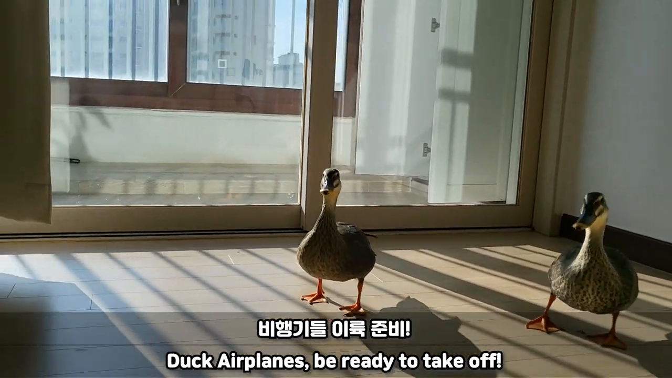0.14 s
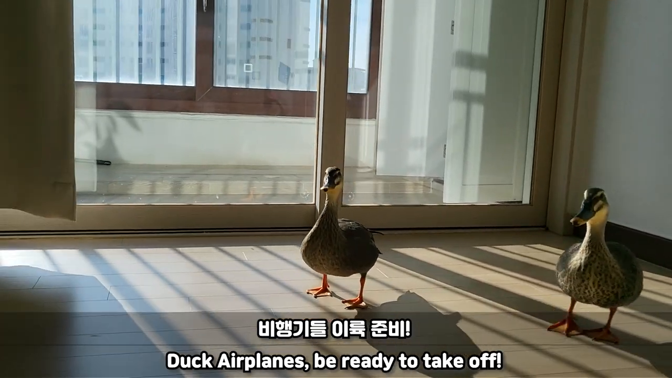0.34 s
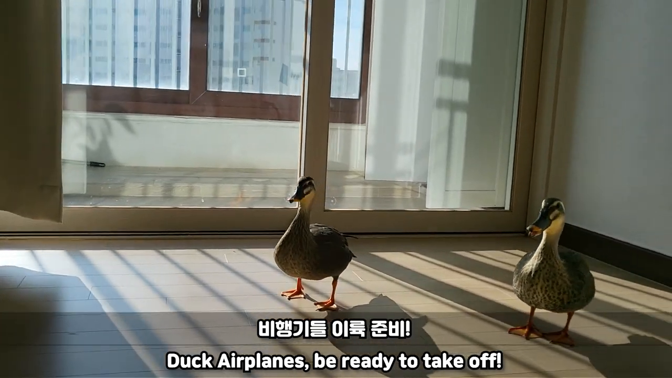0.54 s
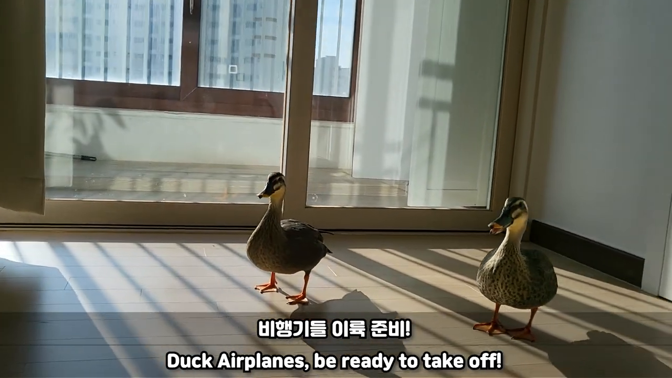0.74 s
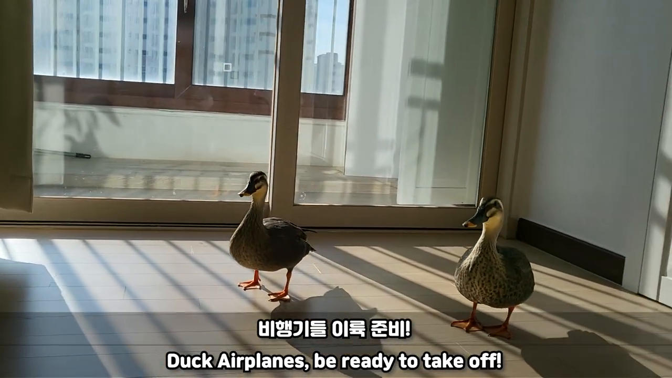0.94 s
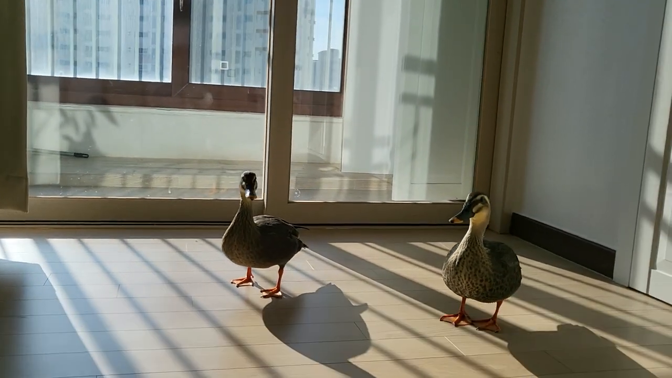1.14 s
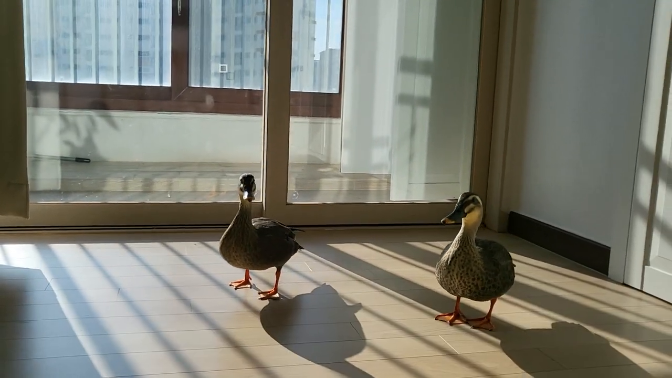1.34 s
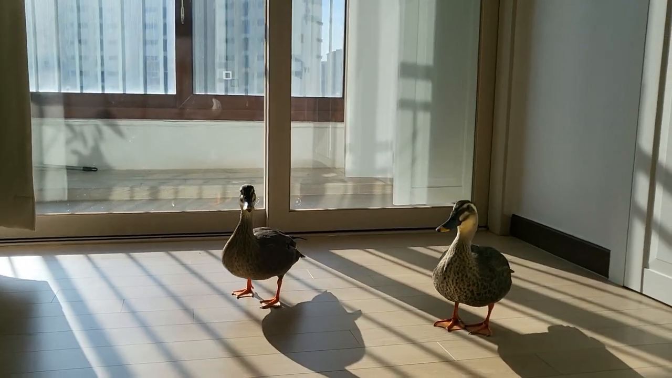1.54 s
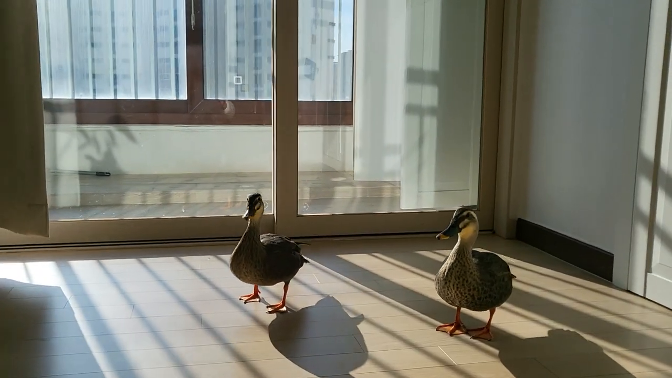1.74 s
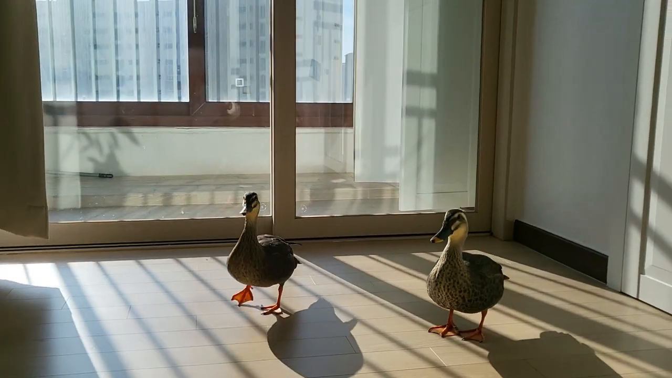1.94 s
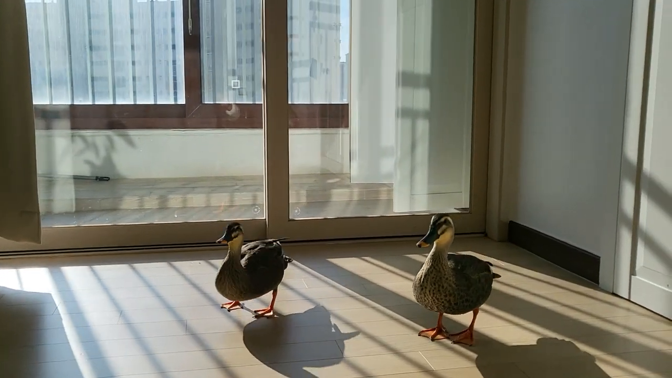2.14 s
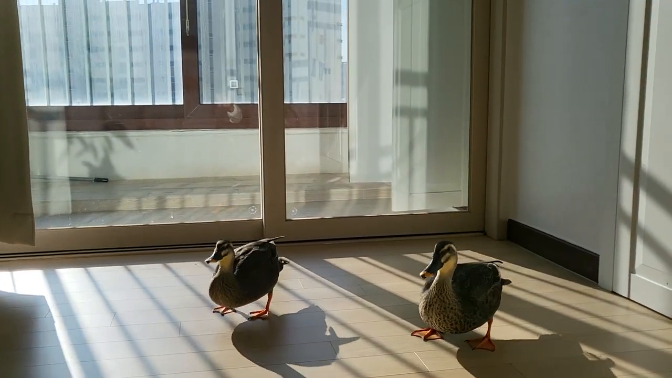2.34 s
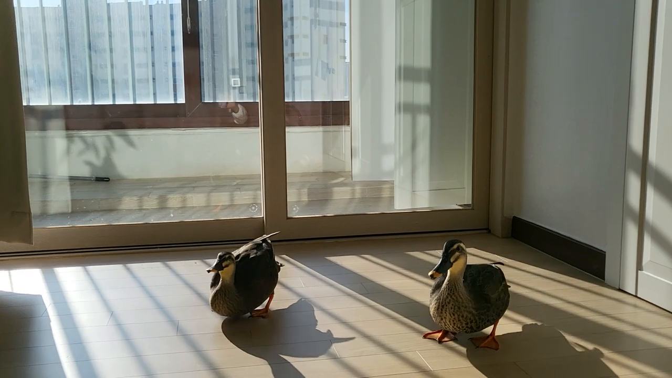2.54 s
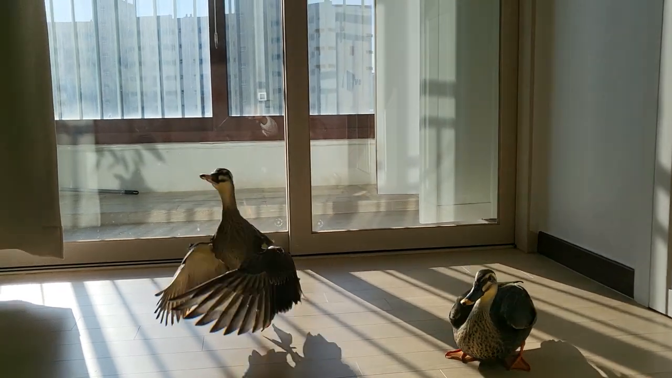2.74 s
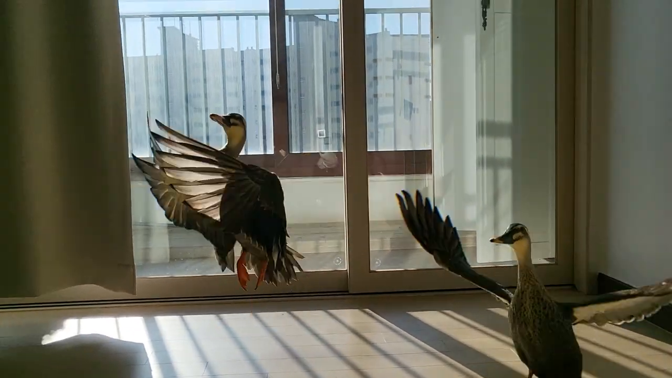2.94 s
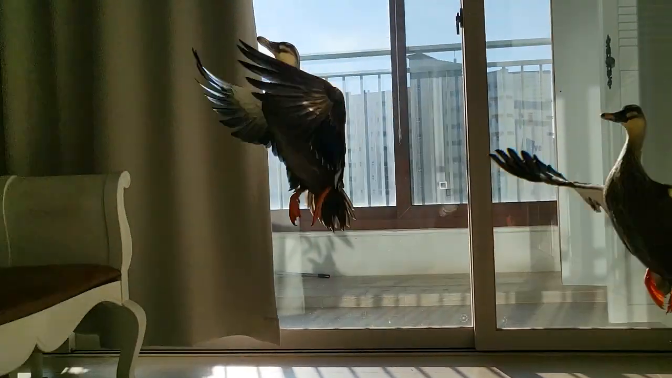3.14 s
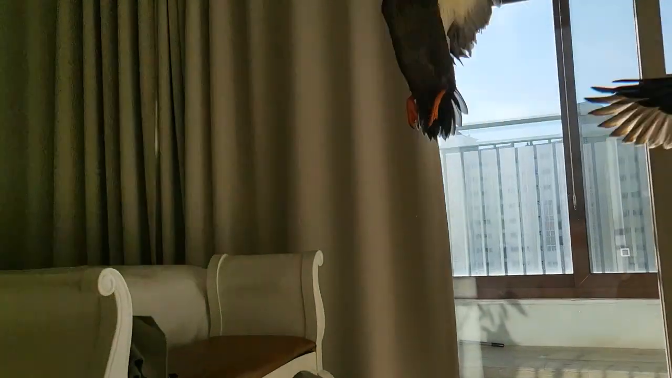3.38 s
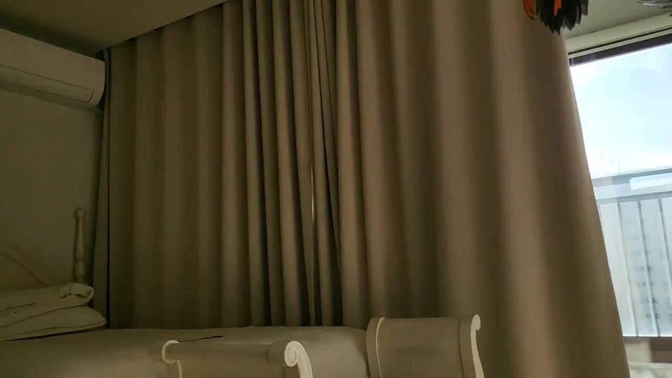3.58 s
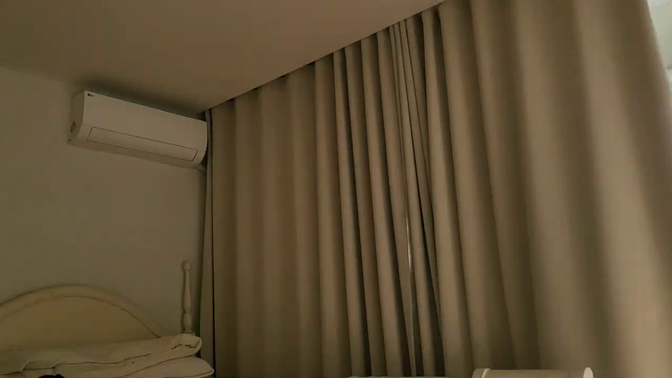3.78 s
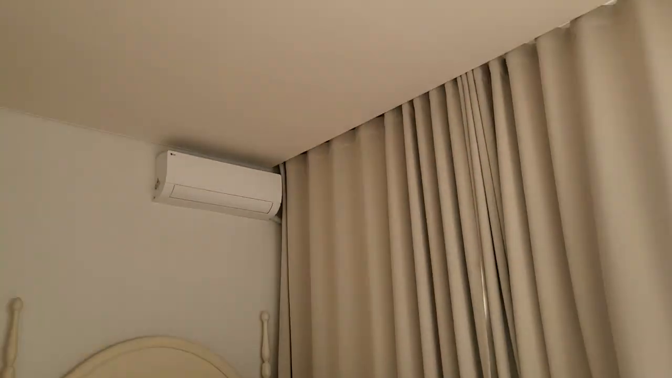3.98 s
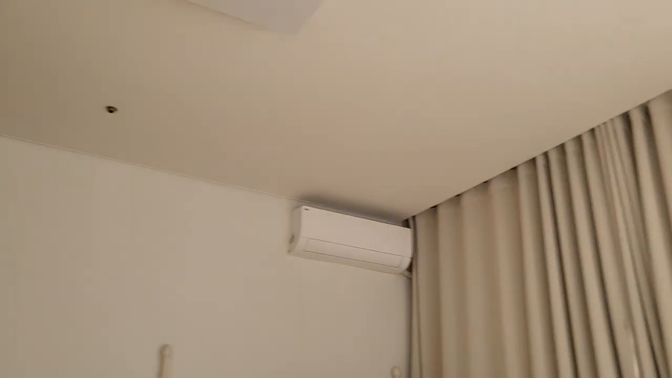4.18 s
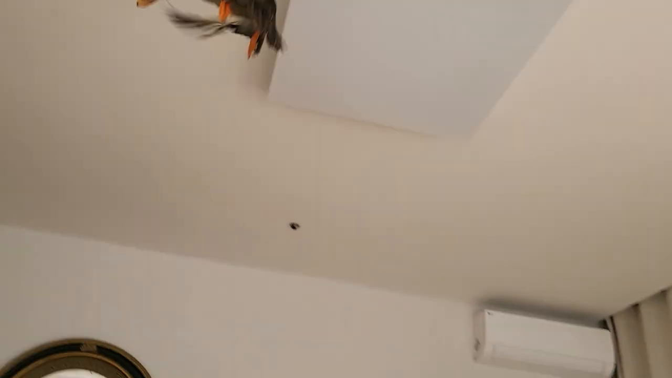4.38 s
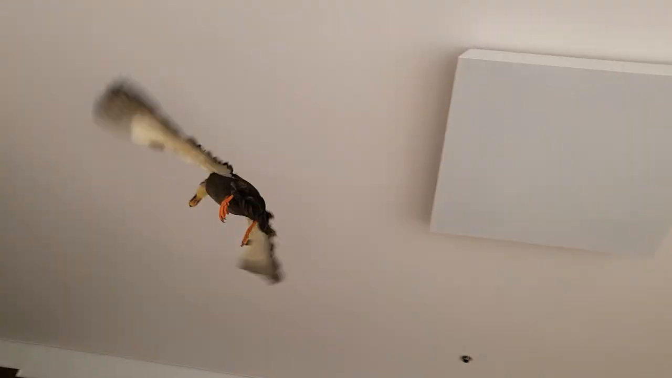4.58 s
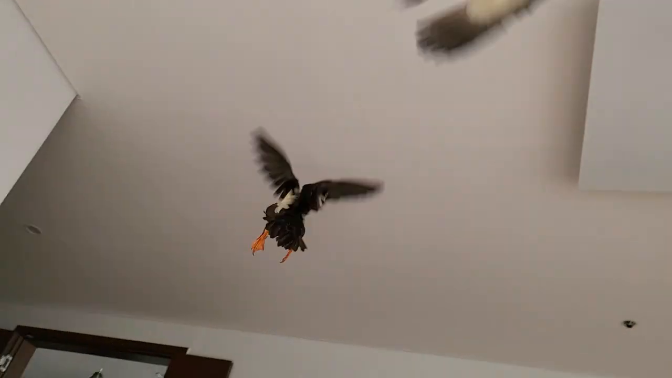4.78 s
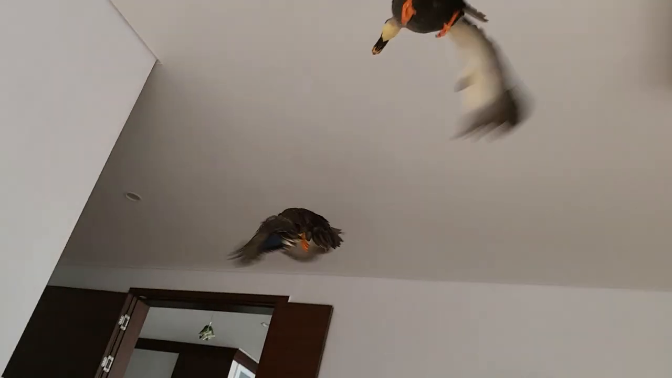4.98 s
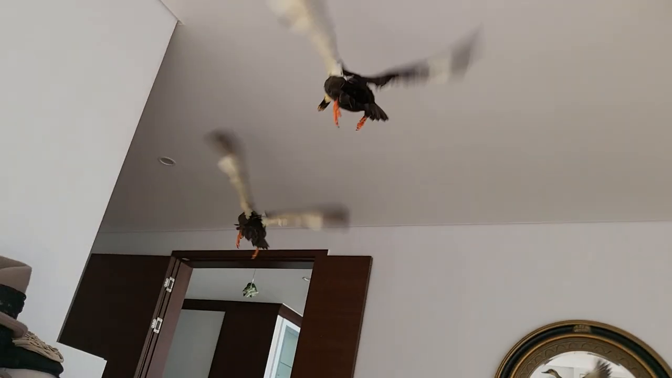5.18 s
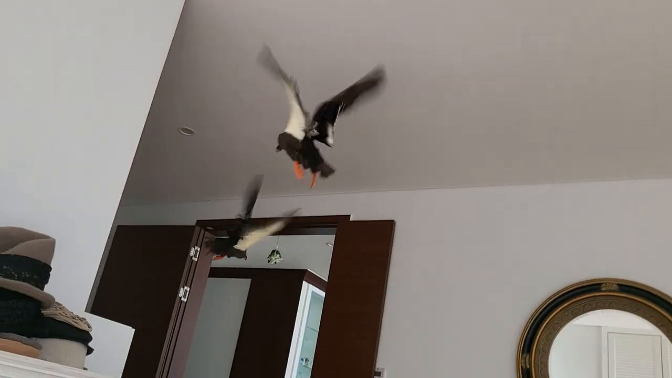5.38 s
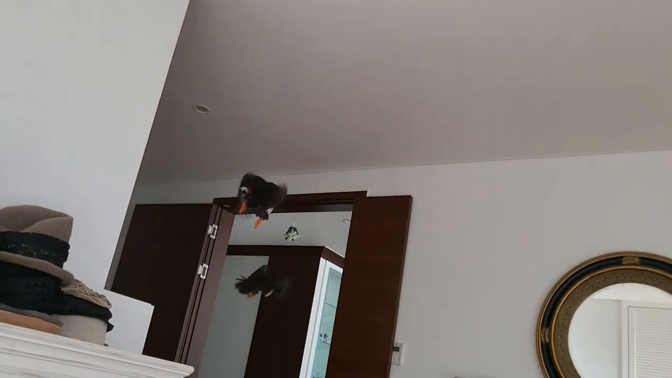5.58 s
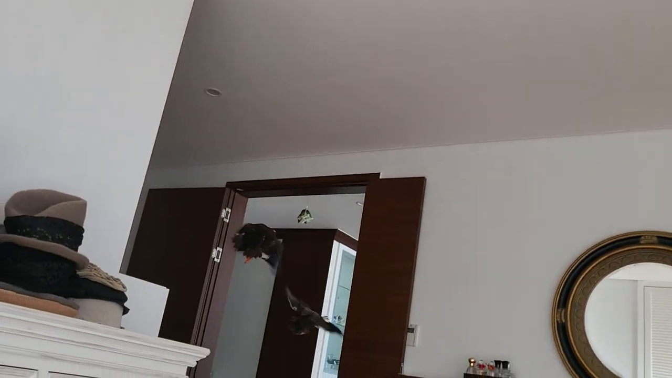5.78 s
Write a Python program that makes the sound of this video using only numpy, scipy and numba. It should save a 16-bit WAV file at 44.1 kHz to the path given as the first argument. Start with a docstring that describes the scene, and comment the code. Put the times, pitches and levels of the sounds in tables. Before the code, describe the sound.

Hoarse duck quacks, soft peeps and webbed footsteps in a quiet room give way to loud flapping, swishing feathers and gusts of air.

```python
"""Wingbeats of two ducks taking off in a living room: each stroke displaces air with a clap and a whoosh, while
feathers rush, swish, snap and squeak. The downwash buffets the microphone, and the loudest moments clip. Before
the flight come hoarse quacks, pulses of the syrinx filtered by windpipe and bill, with soft peeps, shuffling
and webbed steps on the hard floor. Calls and steps reverberate over a quiet house."""
import sys
import numpy as np
from scipy import signal
from scipy.fft import rfft, irfft
from scipy.io import wavfile
from scipy.ndimage import uniform_filter1d
from numba import njit

SR = 44100
rng = np.random.default_rng(int(sys.argv[2]) if len(sys.argv) > 2 else 0)


def store_wav(level_fs):
    """Save 16-bit WAV to argv[1]."""
    pcm = np.round(np.clip(np.atleast_2d(level_fs), -1, 1) * 32767)
    wavfile.write(sys.argv[1], SR, pcm.T.astype(np.int16))


N = 256652


def undb(db):
    """Amplitude ratio of a level in decibels."""
    return 10 ** (np.asarray(db) / 20)


def level(x, db):
    """Normalisation to a given rms level."""
    return x * undb(db) / np.sqrt(np.mean(x ** 2))


def even(x, span_s):
    """Division by the running rms: slow level changes vanish, faster grain stays."""
    power = np.atleast_2d(x ** 2).mean(axis=0)
    span = int(span_s * SR)
    return x / np.sqrt(np.maximum(uniform_filter1d(uniform_filter1d(power, span), span), 1e-18))


def pan(x, db):
    """Level difference between channels: left exceeds right by db."""
    return x * undb(np.array([db / 2, -db / 2]).reshape(2, -1))


def add(track, start_s, sound):
    """Superposition of a short sound on a track."""
    i = int(start_s * SR)
    n = min(sound.shape[-1], N - i)
    track[..., i:i + n] += sound[..., :n]


def arch(swell_s, fade_s, swell_db, fade_db):
    """Envelope in dB relative to its peak: a rounded rise, then exponential decay."""
    t = np.arange(0, swell_s + fade_s, 1 / SR)
    rise_db = -swell_db * np.clip(1 - t / swell_s, 0, 1) ** 1.3
    return rise_db - fade_db * np.clip((t - swell_s) / fade_s, 0, 1)


@njit
def resonator(x, hz, width_hz):
    """Second-order resonance: a state-variable band-pass with unit gain at the centre."""
    y, band, low = np.empty(len(x)), 0., 0.
    g, damping = np.tan(np.pi * hz / SR), width_hz / hz
    for i in range(len(x)):
        v = (band + g * (x[i] - low)) / (1 + g * (g + damping))
        band, low, y[i] = 2 * v - band, low + 2 * g * v, damping * v
    return y


def ring(x, modes):
    """Modal sum: fourth-order resonances (centre_hz, width_hz, gain_db) of alternating sign."""
    return sum((-1) ** k * undb(db) * resonator(resonator(x, hz, width), hz, width)
               for k, (hz, width, db) in enumerate(np.array(modes, float)))


def wander(rate_hz):
    """Random modulation: stepped Gaussian values, smoothed twice."""
    hold = int(SR / rate_hz)
    stairs = np.repeat(rng.standard_normal(N // hold + 1), hold)
    return .78 * uniform_filter1d(uniform_filter1d(stairs, hold), hold)[:N]


def band_noise(spectrum, side, flicker_db, flicker_hz):
    """Stereo noise in independently modulated half-octave bands; side decorrelates the channels."""
    hz, db = np.transpose(spectrum)
    octaves = np.arange(0, np.log2(hz[-2] / hz[1]) + .3, .5)
    out = 0
    for centre in np.clip(hz[1] * 2 ** octaves, 1, .33 * SR):
        width = centre / 2 / np.sinc(2 * centre / SR)  # offsets the filter's narrowing in the treble
        mid, diff = (ring(rng.standard_normal(N), [(centre, width, 0)]) for _ in range(2))
        gain = undb(np.interp(np.log(centre), np.log(hz), db) + flicker_db * wander(flicker_hz))
        out = out + gain * (mid + side * diff * np.array([[1], [-1]]))
    return even(out, .05)


# Background spectrum of the house: frequency_hz, relative_db
HOUSE_SPECTRUM = [(24, -35), (40, 1), (80, -3), (174, -3.5), (213, -10), (387, -11.5), (1130, -21),
                  (1960, -21), (5050, -30), (11200, -18), (15500, -32)]

def house():
    """Ambient noise floor: faint, strongest in the bass, uncorrelated between the channels."""
    return undb(-56.5) * pan(band_noise(HOUSE_SPECTRUM, side=1, flicker_db=.7, flicker_hz=13), 1.2)


@njit
def walls(x, lags, gain, damping):
    """Repeated reflection: eight coupled delay lines lose a little treble on every pass."""
    line, echo, out = np.zeros((8, 4096)), np.zeros(8), np.zeros((2, len(x)))
    for i in range(len(x)):
        total = 0.
        for k in range(8):
            echo[k] += (1 - damping) * (gain[k] * line[k, (i - lags[k]) & 4095] - echo[k])
            total += echo[k]
            out[k % 2, i] += echo[k]
        for k in range(8):
            line[k, i & 4095] = x[i] + echo[k] - total / 4
    return out


def reverberation(direct, t60_s=.28):
    """Reflected sound decays exponentially; curtains and thin walls let the bass escape."""
    lags = rng.integers(300, 1800, size=8)
    retained = resonator(direct.mean(axis=0) + 1e-18, 1730., 9000.)
    echoes = walls(retained, lags, 1000. ** (-lags / SR / t60_s), damping=.017)
    return undb(-11) * pan(echoes, -3)


# Rustles of feet and feathers: start_s, swell_s, fade_s, peak_db
RUSTLES = [(0, 0.0022, 0.048, -42), (.04, 0.0045, 0.051, -39.5), (.07, 0.054, .35, -41),
           (.3, 0.19, .3, -64), (1.226, 0.017, 0.036, -45.5), (1.34, 0.022, 0.36, -54),
           (1.946, 0.0027, 0.051, -40), (2.1, 0.12, .25, -49.5), (2.55, .05, .3, -39.5)]

def shuffle():
    """Friction noise: a dry rustle as the ducks shift their weight."""
    gain = np.zeros(N)
    for start_s, swell_s, fade_s, peak_db in RUSTLES:
        add(gain, start_s, undb(peak_db + arch(swell_s, fade_s, swell_db=5, fade_db=16.5)))
    spectrum = [(1500, -30), (2500, -8.5), (7000, -12.5), (11000, -25), (15000, -11.5), (16000, -30)]
    return gain * band_noise(spectrum, side=.5, flicker_db=6, flicker_hz=40)


# Webbed footfalls: start_s, thud_db, thud_hz, thud_t60_s, slap_db, claw_db, pan_db
FOOTFALLS = [(0.019, -41, 70.5, 0.094, -31, -57, 4), (0.081, -53, 90, .1, -65, -37, 24),
             (0.135, -54, 90, .1, -59, -35.5, 25), (0.24, -23.5, 56.3, 0.19, -42.5, -39, 18),
             (0.272, -35, 90, 0.22, -39, -50, -1), (0.585, -40, 124, 0.13, -47, -61, 4),
             (.92, -42.5, 75.4, 0.086, -65, -70, -2), (1.151, -76, 100, 0.085, -81, -51, 9),
             (1.288, -33.5, 106, 0.059, -66, -41, 15), (1.346, -61, 90, .1, -80, -44.5, 24.5),
             (1.541, -70, 100, .1, -54, -43, 6), (1.946, -17.5, 91, 0.26, -36.5, -46, 3.5),
             (1.987, -11.5, 103.7, 0.16, -30.5, -57, 1), (2.351, -46, 99, 0.12, -31, -35, -3)]

def steps(knock_hz=280, knock_s=.01):
    """Impact excites damped modes of the boards, a thud and a knock; the web slaps, the claws tick."""
    out, t = np.zeros((2, N)), np.arange(SR // 3) / SR
    knock = undb(-5) * np.sin(2 * np.pi * knock_hz * t) * t / knock_s * np.exp(-2 * t / knock_s)
    attack = (1 - np.exp(-t / .0069)) ** 2
    for start_s, thud_db, thud_hz, t60_s, slap_db, claw_db, pan_db in FOOTFALLS:
        noise = rng.standard_normal((2, len(t)))
        thud = np.sin(2 * np.pi * thud_hz * t) * 1000. ** (-t / t60_s) * attack
        slap = level(resonator(noise[0], 640., 610.), slap_db) * np.exp(-t / .066)
        claw = level(resonator(noise[1], 4500., 8000.), claw_db) * np.exp(-t / .0025)
        add(out, start_s, pan(undb(thud_db) * (thud + knock) + slap + claw, pan_db))
    return out


# Soft notes of the second duck: start_s, length_s, start_pitch_hz, end_pitch_hz, level_db, pan_db
PEEP_NOTES = [(0.001, 0.045, 605, 805, -27, -4), (0.018, 0.022, 495, 530, -32, -1),
              (.022, 0.029, 1666, 1986, -27, -2), (0.037, 0.041, 882, 1065, -29, -1),
              (0.046, .035, 2590, 2640, -36, -3), (0.118, 0.069, 1010, 1002, -29.5, -1),
              (0.173, .04, 978, 860, -30.5, 3), (0.191, 0.03, 572, 426, -33.5, 0),
              (2.062, 0.05, 1126, 1107, -37.5, 3), (2.113, 0.2, 979, 981, -29.5, 5.5),
              (2.187, 0.027, 1160, 1190, -32, -13), (2.222, 0.038, 1164, 1161, -20.5, 2),
              (2.224, 0.056, 801, 908, -27.5, -6), (2.263, 0.014, 687, 637, -23.5, 2),
              (2.272, 0.021, 485, 480, -28, -3), (2.281, 0.024, 1140, 1134, -28, 6),
              (2.315, 0.028, 937, 970, -30.5, 2), (2.37, 0.031, 658, 720, -27, 4),
              (2.369, 0.031, 423, 398, -26, -3), (2.379, 0.042, 1000, 1128, -20.5, 4)]

def peeps(waver_rad=.6, hoarseness=.35):
    """Random phase and amplitude modulation roughen a gliding tone of two harmonics."""
    out = np.zeros((2, N))
    for start_s, length_s, start_hz, end_hz, level_db, pan_db in PEEP_NOTES:
        progress = np.arange(0, 1, 1 / (length_s * SR))
        waver, flutter = (level(resonator(noise, 45., 67.), 0)[:len(progress)]
                          for noise in rng.standard_normal((2, SR // 4)))
        phase = 2 * np.pi * np.cumsum(start_hz + (end_hz - start_hz) * progress) / SR + waver_rad * waver
        note = (np.sin(phase) + undb(-14) * np.sin(2 * phase)) * (1 + hoarseness * flutter)
        add(out, start_s, pan(undb(level_db) * np.sin(np.pi * progress) ** .32 * note, pan_db))
    return out


def syrinx(t, pulse_s, start_hz, end_hz, roughness):
    """Membranes collide in a pulse train with jitter and shimmer; returns it and the pulsed breath."""
    jitter, shimmer = rng.standard_normal((200, 2)).T
    breath = rng.standard_normal((2, SR))[:, :len(t)]
    cycles = np.cumsum(np.linspace(start_hz, end_hz, len(t))) / SR
    cycles = cycles - np.interp(pulse_s - .002, t, cycles) + 100  # pulse_s sets the phase of the train
    cycles = cycles + .2 * roughness * np.interp(cycles, np.arange(200), jitter)
    strength = undb(3.5 * roughness * shimmer[cycles.astype(int) % 200])
    puff = np.exp(-(cycles % 1) / .5)
    pulses = 12 * np.diff(np.floor(cycles), prepend=np.floor(cycles[0]))
    source = strength * (pulses + 3.5 * roughness * (puff + .5 * roughness) * breath[0])
    softened = resonator(source, 1940., 1570.)  # the membranes meet softly
    return softened, (1.2 + puff) * breath[1]


# Resonances of windpipe, open bill, nostril whistle and breath rasp: centre_hz, width_hz, gain_db
WINDPIPE_MODES = [(1366, 140, -3.5), (1815, 282, 1.5)]
BILL_MODES = [(2895, 430, -13.5), (3700, 370, -15)]
NOSTRIL_MODES = [(6500, 1080, 18.5)]
RASP_MODES = [(4460, 1400, 8), (5800, 1500, 6.5), (7330, 410, 8)]
# Quacks: start_s, swell_s, fade_s, swell_db, peak_db, bill_hz, opening_db, whistle_db, pan_db,
# pulse_s, start_pitch_hz, end_pitch_hz, roughness_ratio, rasp_db, chest_db
QUACK_CALLS = [(.07, 0.083, 0.1, 10, -23, 2150, 2, -17, -4, .153, 105.5, 104, 0.54, 2, -17),
               (.25, .485, .03, 12, -21, 2200, 2, -11, -1, .737, 93, 96, .62, -2, -27),
               (1.34, 0.022, 0.13, 12, -54, 1970, -5, -10, -2, 1.35, 100, 99, 0.65, 0, -20),
               (1.551, 0.039, 0.067, 16, -22.5, 2160, 1, -15, -8.5, 1.88, 105.2, 101.4, 0.48, 5, -8),
               (1.785, 0.032, 0.062, 10, -18, 2154, 4, -16.5, -3.5, 1.6, 114.7, 109.9, 0.27, 1, -24),
               (1.997, 0.024, 0.059, 7, -15, 2185, 4, -15.5, -4, 2.004, 126.7, 98.8, 0.34, 4, -24),
               (2.09, 0.12, 0.14, 12, -27.5, 1960, 5, -11.5, 0, 1.9, 125, 117.5, 0.8, 17, -22),
               (2.362, 0.036, 0.077, 8, -10, 2204, 12, -15, -4.5, 2.42, 129.8, 127.8, .4, 5, -16),
               (2.557, 0.037, 0.084, 11.5, -6.5, 2214, 15.5, -14, -3, 2.8, 126.7, 139, 0.23, 8, -15)]

def quacks(chest_hz=700, head_turn_db=11.5):
    """Source and filter: syrinx pulses excite windpipe and bill, and breath whistles in the nostrils."""
    out = np.zeros((2, N))
    for (start_s, swell_s, fade_s, swell_db, peak_db, bill_hz, opening_db, whistle_db, pan_db,
         pulse_s, start_hz, end_hz, roughness, rasp_db, chest_db) in QUACK_CALLS:
        effort_db = arch(swell_s, fade_s, swell_db, fade_db=22)
        t = start_s + np.arange(len(effort_db)) / SR
        source, breath = syrinx(t, pulse_s, start_hz, end_hz, roughness)
        windpipe = ring(source, [(chest_hz, 440, chest_db)] + WINDPIPE_MODES)
        bill = ring(source, BILL_MODES) - ring(source, [(bill_hz, 250, 0)])
        opening = undb(opening_db + .42 * effort_db)  # the bill closes as the effort drops
        voice = even(windpipe + opening * bill, .025)
        whistle = level(ring(breath, NOSTRIL_MODES) + undb(rasp_db) * ring(breath, RASP_MODES), 0)
        whistle *= undb(whistle_db + .27 * effort_db)  # grows faster than the voice
        edges = np.clip(np.minimum(t - t[0], t[-1] - t) / .007, 0, 1)
        turn_db = head_turn_db * np.clip((t - start_s - swell_s) / fade_s, 0, 1)  # leftward in the fade
        add(out, start_s, pan((voice + whistle) * undb(peak_db + effort_db) * edges, pan_db + turn_db))
    return out


# Feather squeaks: start_s, length_s, pitch_hz, level_db, pan_db
VANE_SQUEAKS = [(2.825, 0.016, 2950, -33, 0), (2.867, 0.027, 3970, -22.5, 0), (2.933, .02, 5170, -29, 0),
                (2.949, .02, 6450, -22.5, 13), (3.136, 0.027, 4680, -29, 9), (3.431, 0.04, 4570, -29, 8)]

def squeaks(width_hz=400):
    """Flow-excited resonance: a feather vane sings briefly in a narrow band of noise."""
    out = np.zeros((2, N))
    for start_s, length_s, pitch_hz, level_db, pan_db in VANE_SQUEAKS:
        progress = np.arange(0, 1, 1 / (length_s * SR))
        tone = level(ring(rng.standard_normal(SR // 5), [(pitch_hz, width_hz, 0)]), level_db)
        add(out, start_s, pan(tone[-len(progress):] * np.sin(np.pi * progress), pan_db))
    return out


# Sweeps of the long wing feathers: centre_s, level_db
FEATHER_SWEEPS = [(2.86, -20.5), (2.96, -32), (3.15, -34), (3.62, -27), (3.9, -31.5), (4.03, -34),
                  (4.12, -37), (4.46, -47), (4.585, -29), (4.675, -34), (4.785, -38), (4.89, -53),
                  (5.0, -29.5), (5.11, -52), (5.23, -30.5), (5.335, -30.5), (5.445, -30.5), (5.56, -36),
                  (5.685, -50)]

def swishes(t, half_width_s=.025):
    """Flow noise: long feathers cut the air in Gaussian swells of hiss."""
    gain = sum(undb(db) * np.exp(-((t - centre_s) / half_width_s) ** 2) for centre_s, db in FEATHER_SWEEPS)
    spectrum = [(3000, -30), (4200, 1), (5500, 4), (7400, -2), (9000, -30)]
    return gain * band_noise(spectrum, side=1, flicker_db=7.9, flicker_hz=40)


# Flight feathers snapping together: start_s, gain_db
FEATHER_SNAPS = [(2.665, -27), (2.7024, -12), (2.822, -16), (3.003, -9), (3.1008, -9), (3.199, -12),
                 (3.297, -8.5), (3.409, -12), (3.616, -14.5), (4.041, -14.5), (4.147, -23), (4.352, -27),
                 (4.467, -26), (4.587, -29), (4.6553, -23), (4.775, -22), (4.883, -24), (4.983, -23),
                 (5.3168, -27), (5.435, -30)]

def snaps(snap_s=.0095):
    """Impact transients: colliding feathers radiate short bursts of treble noise."""
    gain, age = np.zeros(N), np.arange(0, 6, 1 / (snap_s * SR))
    for start_s, gain_db in FEATHER_SNAPS:
        add(gain, start_s, undb(gain_db) * (1 - np.exp(-8 * age)) * np.exp(-2 * age))
    spectrum = [(4000, -30), (5500, -3), (8000, -2), (11000, 1), (15500, 3), (16000, -30)]
    return gain * band_noise(spectrum, side=1, flicker_db=1.5, flicker_hz=43)


# Spectra of wind on the microphone ports: frequency_hz, relative_db
BUFFET_SPECTRUM = [(12, -40), (20, -23.5), (59, 4.5), (75, 1.5), (97, -9), (110, -40), (140, -74),
                   (240, -120)]
FLUTTER_SPECTRUM = [(53, -32), (90, 2.5), (129, 9.5), (189, -5.5), (250, -3.5), (320, -56), (550, -120)]
# Gusts of downwash: centre_s, half_width_s, buffet_db, flutter_db, pan_db
DOWNWASH_GUSTS = [(2.737, 0.041, -18.5, -36, 0), (2.884, 0.098, -14.5, -17.5, -0.5),
                  (2.987, 0.048, -10, -19, -2), (3.09, 0.12, -6, -35, 0), (3.266, 0.088, -9, -41, -2),
                  (3.383, 0.051, -12, -43, 3), (3.545, 0.096, -19.5, -44, 0),
                  (3.688, 0.045, -13.5, -31, -3), (3.791, 0.046, -8.5, -4, -15.5),
                  (3.883, 0.035, -4, -7.5, 3), (3.934, 0.057, -8.5, -5.5, 9),
                  (4.02, 0.046, -10.5, -13.5, -2), (4.132, .04, -19.5, -14, 1.5),
                  (4.261, 0.015, -13.5, -36, 2), (4.35, 0.11, -25, -39, 0), (4.466, 0.041, -26.5, -23, -3),
                  (4.6, 0.06, -23.5, -40, 0), (4.69, 0.059, -23.5, -38, 1), (4.799, .03, -21, -21.5, 0),
                  (5, 0.11, -20.5, -31, 3), (5.208, 0.043, -9, -3, 4.5), (5.302, 0.012, -5, -2.5, 6),
                  (5.342, .03, -21, -11.5, -4), (5.453, 0.066, -26, -25, 15),
                  (5.603, 0.11, -24.5, -26.5, -1), (5.745, 0.041, -26, -22.5, -5)]

def downwash(t, airflow):
    """Turbulent pressure on the ports, a deep buffet and a faster flutter; gusts add in power."""
    buffet = flutter = undb(-14) * airflow  # air stirs between the gusts
    for centre_s, half_width_s, buffet_db, flutter_db, pan_db in DOWNWASH_GUSTS:
        gust = pan(np.exp(-((t - centre_s) / half_width_s) ** 2), pan_db)
        buffet = np.hypot(buffet, undb(buffet_db) * gust)
        flutter = np.hypot(flutter, undb(flutter_db) * gust)
    return (buffet * band_noise(BUFFET_SPECTRUM, side=.6, flicker_db=1, flicker_hz=12)
            + flutter * band_noise(FLUTTER_SPECTRUM, side=.7, flicker_db=1, flicker_hz=20))


# Spectra of displaced air and rubbing feathers: frequency_hz, relative_db
WHOOSH_SPECTRUM = [(88, -32), (150, 5), (195, -1), (320, 1.5), (468, 1.5), (575, -1), (878, -13.5),
                   (1230, -29), (2000, -14.5), (2600, -51), (4400, -120)]
RUSH_SPECTRUM = [(710, -23), (1200, -2), (2680, -10.5), (2890, -13.5), (5910, -13), (6510, -13.5),
                 (9080, -21.5), (11500, -19.5), (14200, -16.5), (15500, -21)]
# Sustained flight noise, following the nearness of the wings: time_s, whoosh_db, rush_db
FLIGHT_LEVELS = [(2.65, -41, -30), (2.73, -31, -26), (2.9, -14, -18), (3.0, -19, -14.5), (3.3, -14, -19),
                 (3.42, -22, -21.5), (3.78, -19, -23), (3.95, -24, -25), (4.15, -24.5, -26.5),
                 (4.3, -32, -33), (4.36, -21, -31), (4.6, -22.5, -29), (4.72, -22.5, -30.5),
                 (5.0, -25.5, -31), (5.33, -17.5, -30), (5.4, -26, -30.5), (5.82, -28, -31)]
# Hard slaps of the wing tips: time_s, gain_db
TIP_SLAPS = [(2.795, -8), (3.904, -3), (5.171, -6), (5.183, -8)]
# Wing strokes: time_s, clap_db, whoosh_db
WING_STROKES = [(2.679, -28, -27.5), (2.742, -36, -20.5), (2.796, -43, -15), (2.833, -4.5, -48),
                (2.93, 0, -42), (2.977, -8, -2.5), (3.025, -2, 1), (3.079, -7, -7.5), (3.118, -3.5, -12),
                (3.183, -5, -18.5), (3.218, -7, -30), (3.281, -7, -32), (3.329, -8, -15),
                (3.386, -10.5, -13.5), (3.425, -11, -23), (3.481, -12, -23), (3.599, -8.5, -17),
                (3.7, -39, -30), (3.761, -36, -36), (3.816, -36, -13.5), (3.891, -43, -11),
                (3.96, -31, -18), (4.018, -10.5, -16.5), (4.061, -36, -13), (4.118, -30, -22),
                (4.162, -37, -14), (4.236, -15.5, -19), (4.275, -19.5, -27), (4.335, -14, -25),
                (4.458, -12.5, -33), (4.551, -10.5, -18.5), (4.591, -18, -20.5), (4.664, -13.5, -10.5),
                (4.702, -13.5, -33), (4.758, -10.5, -17), (4.809, -18.5, -24), (4.995, -14, -13.5),
                (5.117, -38, -19), (5.166, -52, -10), (5.219, -28, -23), (5.36, -13, -25),
                (5.407, -18, -27), (5.45, -14.5, -37), (5.578, -13.5, -50), (5.668, -13, -49),
                (5.713, -15, -24)]

def wingbeats(t, stroke_s=.032, room_mode_hz=342.):
    """Aerodynamic noise: wings drive a downwash; each stroke claps and swells the whoosh and rush."""
    times_s, whoosh_levels_db, rush_levels_db = np.transpose(FLIGHT_LEVELS)
    aloft = np.clip((t - times_s[0]) / .03, 0, 1)
    whoosh_gain = aloft * undb(np.interp(t, times_s, whoosh_levels_db))
    rush_gain = aloft * undb(np.interp(t, times_s, rush_levels_db))
    gusts = aloft * downwash(t, whoosh_gain)
    clap_gain, age = np.zeros(N), np.arange(0, 6, 1 / (stroke_s * SR))
    swell = 3 * age * np.exp(-2 * age)
    for time_s, clap_db, whoosh_db in WING_STROKES:
        add(clap_gain, time_s - .003, undb(clap_db) * swell ** 2)
        add(whoosh_gain, time_s - .006, undb(whoosh_db) * swell)
        add(rush_gain, time_s - .006, undb(clap_db - 22) * swell)
    for time_s, gain_db in TIP_SLAPS:
        add(clap_gain, time_s - .001, undb(gain_db) * swell[::12])  # a twelfth as long as a stroke
    grains = undb(2 * wander(300))  # vanes rub in grains, so the rush crackles
    whoosh = whoosh_gain * band_noise(WHOOSH_SPECTRUM, side=.55, flicker_db=3, flicker_hz=30)
    # a standing wave between floor and ceiling booms along with the beats
    boom = undb(-4.5) * np.array([resonator(channel, room_mode_hz, 33.) for channel in whoosh])
    rush = rush_gain * grains * band_noise(RUSH_SPECTRUM, side=.95, flicker_db=2, flicker_hz=25)
    clap_spectrum = [(500, -30), (800, .5), (1400, -4.5), (2600, -19), (4000, -66)]
    claps = clap_gain * band_noise(clap_spectrum, side=.77, flicker_db=3.5, flicker_hz=60)
    return gusts + whoosh + boom + rush + claps


def scene(left_lag_s=94e-6):
    """Superposition of all sources; calls and steps reverberate and reach the right port first."""
    t = np.arange(N) / SR
    floor = quacks() + peeps() + steps()
    delay = np.exp(-2j * np.pi * np.fft.rfftfreq(N, 1 / SR) * left_lag_s)
    direct = np.array([irfft(rfft(floor[0]) * delay, N), floor[1]])
    background = reverberation(floor) + house() + shuffle()
    return background + direct + squeaks() + wingbeats(t) + snaps() + swishes(t)


def record(dry, cutoff_hz=15750):
    """Clipping: the signal clips at full scale, and a steep low-pass limits its bandwidth."""
    lowpass = signal.ellip(10, .2, 60, cutoff_hz, fs=SR, output="sos")
    return np.clip(signal.sosfilt(lowpass, np.clip(dry, -1, 1)), -1, 1)


dry = scene()
out = record(dry)
store_wav(out)
```